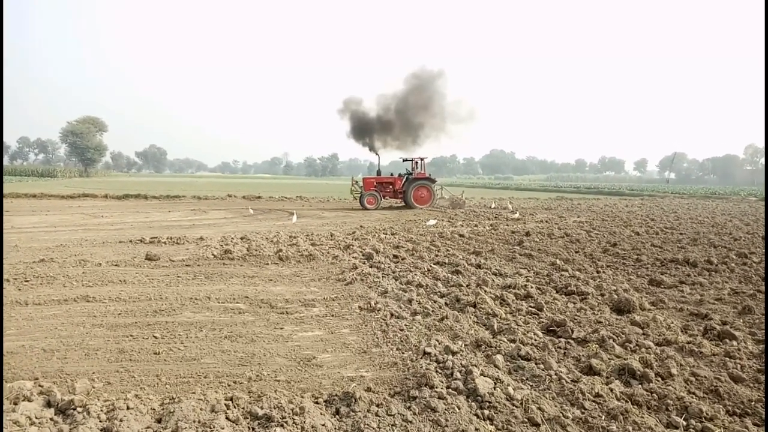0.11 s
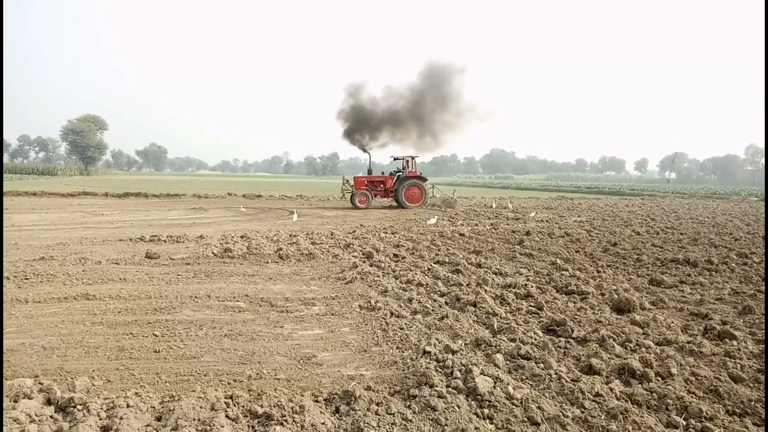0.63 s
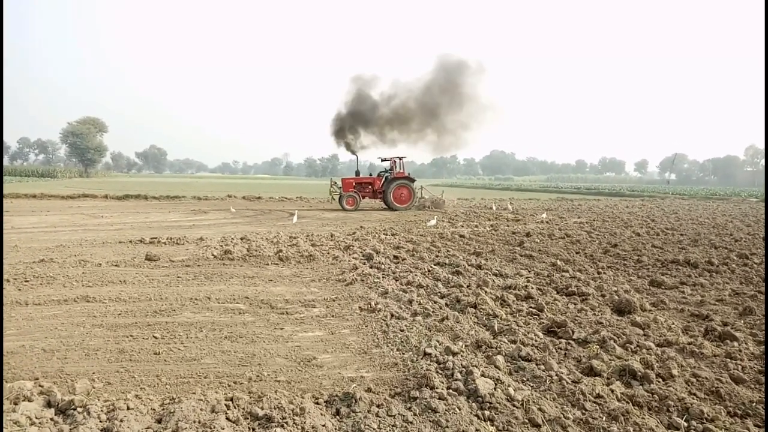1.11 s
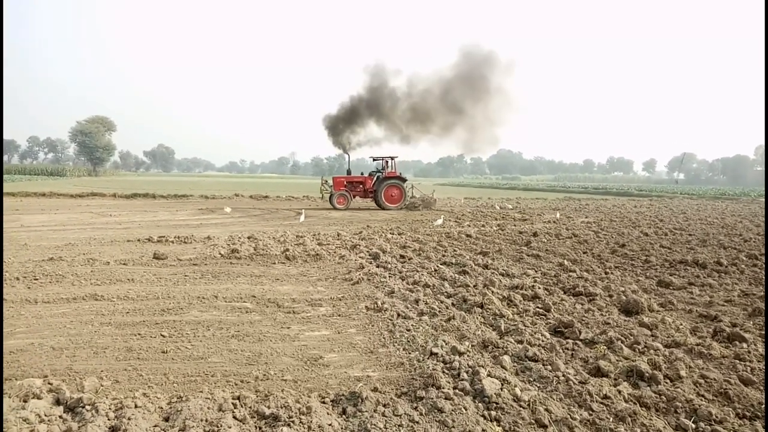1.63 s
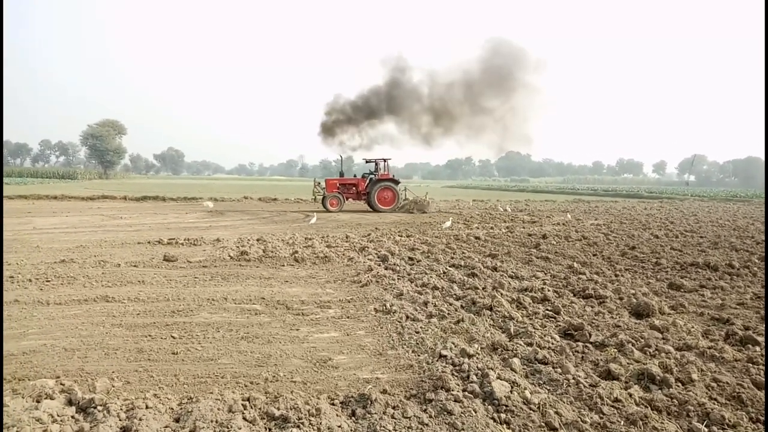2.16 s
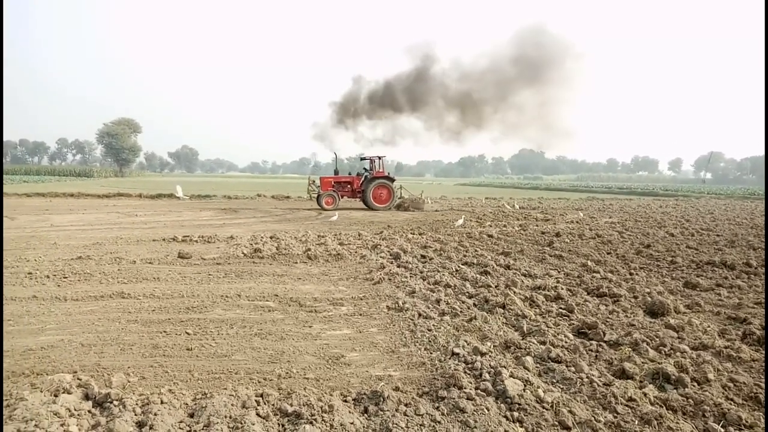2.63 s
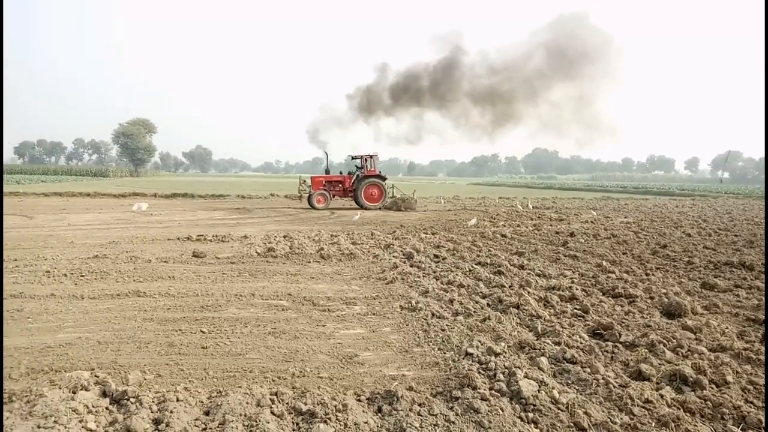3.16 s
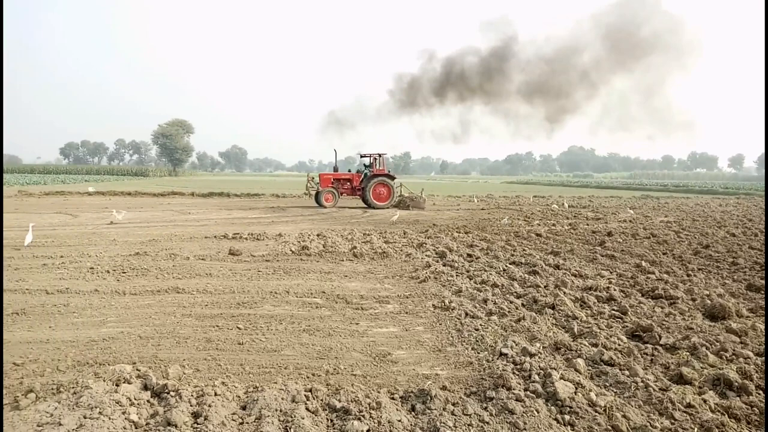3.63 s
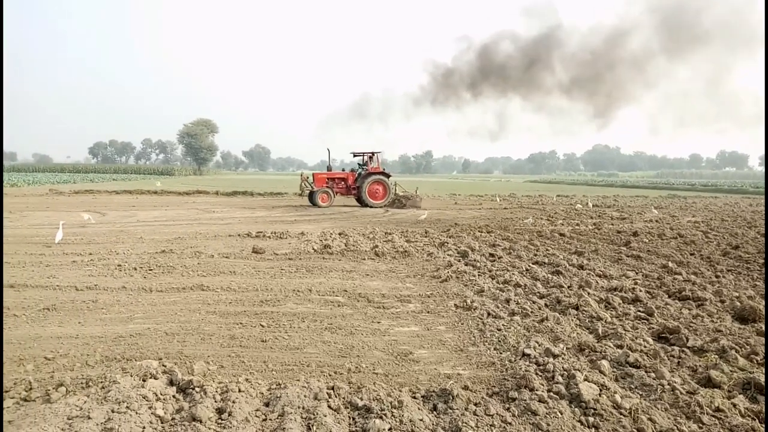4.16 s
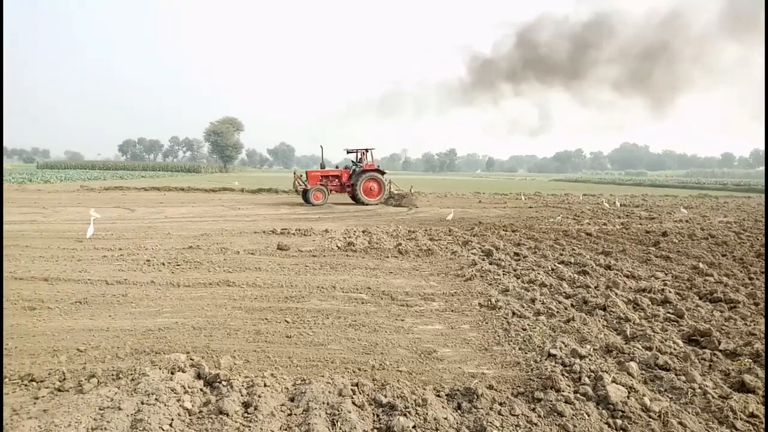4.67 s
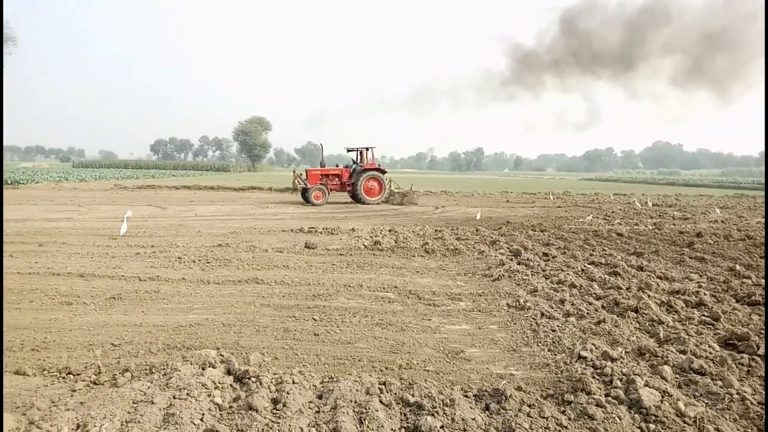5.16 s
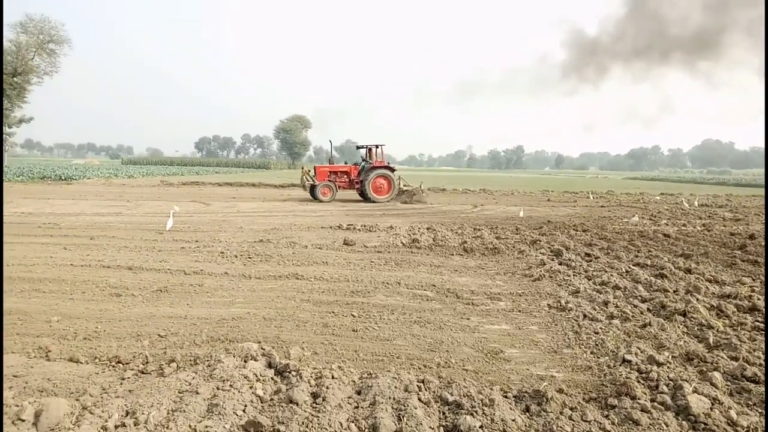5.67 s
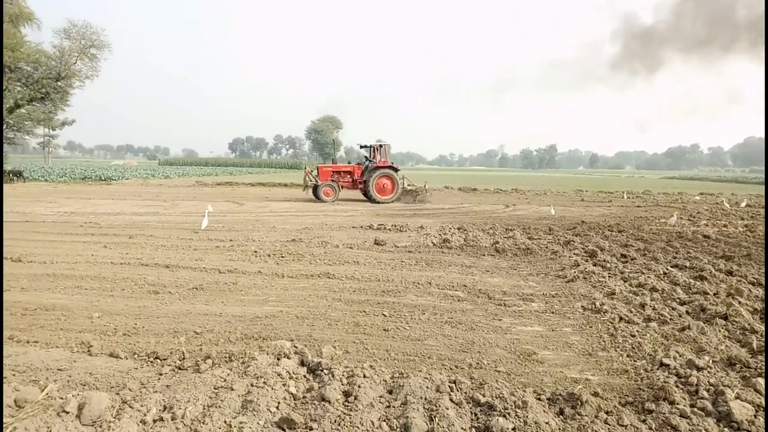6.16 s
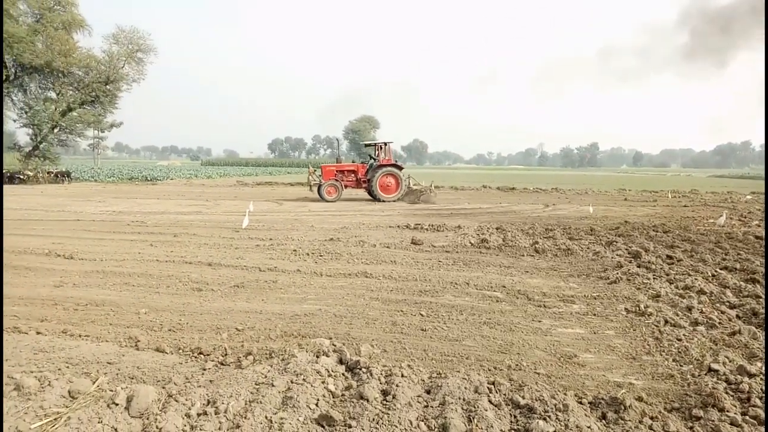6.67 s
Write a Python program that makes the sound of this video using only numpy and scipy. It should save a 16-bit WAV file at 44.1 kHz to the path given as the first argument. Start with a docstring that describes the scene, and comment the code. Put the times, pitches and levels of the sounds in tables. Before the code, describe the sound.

An old four-cylinder diesel tractor works across an open field, heard from some distance. It starts lugging, each firing a hard, uneven knock over a low exhaust drone. After about a second it climbs in pitch, briefly overshoots near two seconds, then holds a roughly steady rattling drone. A handheld stereo recorder picks it up, louder on the left, with no noticeable echo.

```python
"""Across an open field, some way off, a four-cylinder diesel tractor pulls a tiller.
It starts lugging, gains speed, then roughly holds it. The crank drives every layer: sines for the exhaust
drone, gear whine, driveline hum and weaker tones; coloured noise for roar, boom, clatter, rattle, knock and
hiss, pulsed by firings and taps; struck resonances for the block. Two unlike microphone ports of a
handheld recorder pick it up."""
import sys
import numpy as np
from scipy import signal
from scipy.fft import rfft, irfft
from scipy.io import wavfile
from scipy.ndimage import uniform_filter1d, minimum_filter1d, map_coordinates

SR = 44100
rng = np.random.default_rng(int(sys.argv[2]) if len(sys.argv) > 2 else 0)


def int16_out(signal):
    """Quantize to a 16-bit WAV file."""
    q = np.round(np.clip(np.atleast_2d(signal).T, -1, 1) * 32767)
    wavfile.write(sys.argv[1], SR, q.astype(np.int16))


def amplitude_ratio(level_db):
    """Convert a level in decibels to the matching linear amplitude (field) ratio."""
    exponent = np.asarray(level_db, float) / 20
    return 10 ** exponent


N = 299880   # samples, 6.8 s
WORKING_SPEED = 60   # firings per s


def rms_one(x):
    """Scale to rms 1."""
    return x / np.sqrt(np.mean(x ** 2) + 1e-20)


def in_time(rows):
    """Read a two-column curve at every sample."""
    s, value = np.transpose(rows)
    return np.interp(np.arange(N) / SR, s, value)


def on_bins(points):
    """Read a table over frequency at every FFT bin, along a log axis."""
    hz, value = np.transpose(points)
    return np.interp(np.log(np.arange(N // 2 + 1) * SR / N + 1), np.log(hz), value)


def drift(rate):
    """Slow chance of spread 1, mostly below rate in Hz: twice-smoothed noise, drawn every 40 samples."""
    r = np.exp(-2 * np.pi * rate * 40 / SR)
    noise = rng.standard_normal(N // 40 + 2002)
    slow = signal.lfilter([1], [1, -2 * r, r * r], noise)[2000:]
    return np.interp(np.arange(N) / 40, np.arange(len(slow)), rms_one(slow))


def level(rule, speed):
    """A part's level in dB from engine speed, time gone by and a slow wavering."""
    base_db, per_speed_db, per_s_db, waver_db = rule
    moving_on_db = per_s_db * np.arange(N) / SR
    return base_db + per_speed_db * (speed - WORKING_SPEED) + moving_on_db + waver_db * drift(5.3)


# Engine speed. Each row: time in seconds, firings per second.
ENGINE_SPEED = [(0.0, 51.48), (0.44, 51.73), (0.67, 51.04), (1.07, 50.28), (1.37, 53.58), (1.61, 56.62),
                (2.02, 60.87), (2.22, 64.49), (2.48, 60.23), (2.79, 62.68), (3.04, 60.41), (3.67, 61.26),
                (3.73, 58.72), (4.37, 58.99), (4.5, 59.72), (4.71, 58.08), (4.87, 59.31), (5.84, 61.18),
                (5.88, 59.36), (6.12, 60.73), (6.56, 60.02), (6.8, 61.68)]


def crank():
    """Engine speed, and the running count of firings it adds up to."""
    speed = in_time(ENGINE_SPEED)
    return speed, 0.4875 + np.cumsum(speed) / SR


# The firing swell is deepest while the engine lugs. Each row: time in seconds, depth in dB.
SWELL_DEPTH = [(0, 3.5), (1.25, 3.5), (1.6, 3), (2.0, 2), (2.6, 1.5), (6.8, 2)]


def load():
    """Firing depth in dB, and lugging from 0 (running free) to 1 (labouring)."""
    depth_db = in_time(SWELL_DEPTH)
    return depth_db, np.clip((depth_db - 2) / 1.5, 0, 1)


# Strength each cylinder adds to its swell: one value per cylinder in firing order, in dB.
CYLINDER_STRENGTH = [1.2, -1.5, 1.6, 0.52]


def throb(firings, depth_db, early, spread_db=.6):
    """A swell on every firing, quicker up than down, of a strength that varies by cylinder and by chance."""
    place = firings + early + .5
    count = place.astype(int)
    chance_db = spread_db * rng.standard_normal(N // 500)[count]
    strength_db = np.array(CYLINDER_STRENGTH)[count % 4] + chance_db
    # the swell is zero between firings, so strengths change unheard
    swell = .5 - .5 * np.cos(2 * np.pi * (place % 1) ** 0.74)
    return amplitude_ratio(swell * (2 * depth_db + strength_db) - depth_db)


# Valve and linkage taps in a four-firing cycle. Each row: place in firings, dB over the bed in the bonnet,
# in the casing, in the treble, dB more in the casing while lugging.
VALVE_TAPS = [(0.721, -3, -9, -3, 16), (1.6, 2, -3, -4, 0), (2.44, 4, -12, -8, 0), (2.76, -2, -12, -9, 4),
              (3.4, 2, 9, 4, -6)]


def taps(firings, lugging, length=0.11, spread_db=3):
    """Bursts dying over a length in firings, on a steady bed: envelopes for bonnet, casing and treble."""
    out = np.ones((3, N))
    casing_only = np.array([[0], [1], [0]])
    for place, *levels_db, lugging_db in VALVE_TAPS:
        since = firings - place + 4
        cycle = (since // 4).astype(int)
        chance_db = spread_db * rng.uniform(-1.7, 1.7, N // 2000)[cycle]
        tap_db = np.array(levels_db)[:, None] + chance_db + lugging_db * lugging * casing_only
        out += amplitude_ratio(tap_db) * np.exp(-(since % 4) / length)
    return out


# Share that arrives scattered, unlike at the two ports. Each row: frequency in Hz, share from 0 to 1.
SCATTERED_SHARE = [(300, .03), (900, .1), (1600, .3), (2100, .2), (3500, .4), (6000, .55), (10000, .6)]


def open_air(envelope, colour):
    """Coloured noise of rms 1: a direct part common to both ports plus a scattered part of their own."""
    direct, *scattered = rfft(rng.standard_normal((3, N)) * envelope)
    share = on_bins(SCATTERED_SHARE)
    both = np.sqrt(1 - share ** 2) * direct + share * np.array(scattered)
    last_hz, last_db = colour[-1]
    closed = colour + [(4 * last_hz, last_db - 60)]   # keeps falling above the last point
    return rms_one(irfft(both * amplitude_ratio(on_bins(closed)), N))


def tone(level_db, phase):
    """A sine whose rms follows a level in dB."""
    return np.sqrt(2) * amplitude_ratio(level_db) * np.cos(phase)


# Exhaust at once and at three times the firing rate. Each rule: dB at working speed and 0 s,
# dB per extra firing per second, dB per second as the tractor moves on, slow wavering in dB.
FIRST_ORDER_RULE = (-31, 0.4, -0.14, 1)
THIRD_ORDER_RULE = (-42, 0.6, 0.5, 1.6)
# Exhaust at twice the firing rate. Each row: time in seconds, level in dB.
SECOND_ORDER_LEVEL = [(0, -28.5), (1.5, -29.5), (1.8, -27.5), (2.5, -26.5), (3.3, -26), (3.85, -27),
                      (4.25, -27), (4.6, -30.5), (5.2, -26.5), (5.5, -25), (6.8, -26)]


def exhaust_drone(turn, speed):
    """Clean low orders of the exhaust, locked to the firings with a little wander in level and phase."""
    first_db = level(FIRST_ORDER_RULE, speed) + 0.6 * drift(12)
    second_db = in_time(SECOND_ORDER_LEVEL) + 0.87 * drift(5.0)
    third_db = level(THIRD_ORDER_RULE, speed) + 1.5 * drift(6)
    out = tone(first_db, turn + .08 * drift(6))
    out += tone(second_db, 2 * turn - .4 + 0.079 * drift(0.64))
    return out + tone(third_db, 3 * turn + 2.3 + .4 * drift(2.5))


# Timing gear whine. Each row: time in seconds, level in dB.
GEAR_WHINE_LEVEL = [(0, -39.5), (1.0, -45.5), (1.3, -40.5), (1.6, -36.5), (1.8, -38), (2.1, -49),
                    (2.5, -34.5), (2.9, -36), (3.3, -37.5), (3.7, -35.5), (4.4, -37.5), (5.2, -49),
                    (5.7, -40), (6.2, -57), (6.5, -32.5), (6.8, -44)]


def gear_whine(turn):
    """Timing gears whine at 10.5 times the firing rate."""
    return tone(in_time(GEAR_WHINE_LEVEL) + 1.2 * drift(10), 10.5 * turn + .3 * drift(5))


# Swells of the driveline hum. Each row: start in seconds, length in seconds, peak of the swell alone in dB.
DRIVELINE_SWELLS = [(2.007, 0.53, -44), (3.65, 1.07, -33), (4.89, 0.59, -38.5), (5.5, 1.6, -41.5)]


def driveline_hum(turn):
    """A hum at 4.41 times the firing rate swells smoothly out of a faint bed."""
    t = np.arange(N) / SR
    loudness = amplitude_ratio(-46.5) * np.ones(N)   # bed
    for start, length, peak_db in DRIVELINE_SWELLS:
        loudness += amplitude_ratio(peak_db) * np.sin(np.pi * np.clip((t - start) / length, 0, 1))
    return tone(20 * np.log10(loudness) + 2.4 * drift(9.1), 4.41 * turn + 0.49 * drift(3.1))


# Weaker crank-locked tones, gear teeth and fan among them.
# Each row: multiple of the firing rate, level in dB at the start, level in dB at the end.
WEAKER_TONES = [(1.5, -54, -45.5), (2.22, -42, -52), (2.75, -58, -45), (3.44, -48, -37), (3.72, -62, -37),
                (4, -44.5, -39.5), (4.14, -44.5, -39), (4.75, -55.5, -41), (5, -48, -45), (5.5, -52.5, -39),
                (6, -44, -58), (6.27, -49, -45.5), (6.85, -46, -54), (8.27, -57.5, -50), (9, -55.5, -52),
                (10.25, -59, -40), (10.75, -46, -43.5), (11.25, -52, -42), (11.75, -54, -44),
                (12.75, -45, -54), (13.5, -43.5, -40.5), (14.5, -51, -41.5)]


def weaker_tones(turn):
    """Faint sines on multiples of the firing rate, wavering as the air stirs."""
    out, along = np.zeros(N), np.arange(N) / N
    for multiple, start_db, end_db in WEAKER_TONES:
        level_db = start_db + (end_db - start_db) * along + 2.1 * drift(2.4)
        out += tone(level_db, multiple * turn + 0.78 * drift(2.84) + rng.uniform(0, 2 * np.pi))
    return out


# Colour of the roar. Each row: frequency in Hz, relative dB per Hz.
ROAR_COLOUR = [(25, 0), (45, -19), (85, 3.5), (150, 1.5), (200, -2.5), (255, -1.5), (350, -0.5),
               (460, -16.5), (700, -50)]
# Rule: dB at working speed and 0 s, dB per extra firing per second, dB per second, slow wavering in dB.
ROAR_RULE = (-33.5, 0.25, 0.27, 0.2)


def exhaust_roar(firings, speed):
    """Low noise that puffs twice a firing."""
    puffs = amplitude_ratio(1.3 * np.cos(4 * np.pi * firings + 0.55) + 0.32 * drift(9.9))
    return amplitude_ratio(level(ROAR_RULE, speed)) * open_air(puffs, ROAR_COLOUR)


# Colour of the boom. Each row: frequency in Hz, relative dB per Hz.
BOOM_COLOUR = [(350, -29), (470, -22.5), (560, -12), (630, -4.5), (900, -4), (1050, -4.5), (1250, -24.5)]
# Rule: dB at working speed and 0 s, dB per extra firing per second, dB per second, slow wavering in dB.
BOOM_RULE = (-27, 0.08, -0.32, -0.35)


def bonnet_boom(speed, bonnet_taps, late_swells, clumps):
    """Low-mid bonnet noise, tapped, gently pulsed by firings, roughened by quick chance swells in level."""
    return amplitude_ratio(level(BOOM_RULE, speed)) * open_air(bonnet_taps * late_swells ** 0.27 * clumps, BOOM_COLOUR)


# Colour of the clatter. Each row: frequency in Hz, relative dB per Hz.
CLATTER_COLOUR = [(850, -24.5), (1050, -4.5), (1300, -2), (1700, -5.5), (2300, -12), (3500, -83)]
# Rule: dB at working speed and 0 s, dB per extra firing per second, dB per second, slow wavering in dB.
CLATTER_RULE = (-27, 0.03, 0.02, 0.13)


def casing_clatter(speed, casing_taps, swells, clumps):
    """Midrange noise from the casing, led by the taps and roughened by quick chance swells in level."""
    envelope = casing_taps * swells ** 0.23 * clumps ** .6 * amplitude_ratio(.4 * drift(30))
    return amplitude_ratio(level(CLATTER_RULE, speed)) * open_air(envelope, CLATTER_COLOUR)


# Colour of the rattle. Each row: frequency in Hz, relative dB per Hz.
RATTLE_COLOUR = [(1200, -24.5), (1700, -6), (2150, 1.8), (2500, -6.5), (2850, -1), (3100, -23), (3600, -49)]
# Rule: dB at working speed and 0 s, dB per extra firing per second, dB per second, slow wavering in dB.
RATTLE_RULE = (-29.5, 0.1, -0.28, 0.7)


def upper_rattle(speed, treble_taps, late_swells):
    """Upper-mid noise that follows firings and taps alike."""
    return amplitude_ratio(level(RATTLE_RULE, speed)) * open_air(late_swells ** 1.24 * treble_taps, RATTLE_COLOUR)


# Colour of the combustion knock. Each row: frequency in Hz, relative dB per Hz.
KNOCK_COLOUR = [(2700, -14), (3150, -5.5), (3600, -1.5), (4000, -5.5), (4350, -7.5), (4700, -12.5),
                (5300, -18.5), (6000, -35.5), (8000, -76)]
# Level of the combustion knock. Each row: time in seconds, level in dB.
KNOCK_CURVE = [(0, -29), (1.2, -28.5), (1.8, -28.5), (3.0, -29), (3.9, -30), (5.0, -30), (6.0, -30.5),
               (6.8, -29)]


def combustion_knock(treble_taps, swells):
    """Presence-range noise that swells with each burn, over softened taps."""
    knock_db = in_time(KNOCK_CURVE) + .4 * drift(4)
    return amplitude_ratio(knock_db) * open_air(swells * treble_taps ** 0.44, KNOCK_COLOUR)


# Colour of the injector hiss. Each row: frequency in Hz, relative dB per Hz.
HISS_COLOUR = [(3500, -18), (5200, 14), (6000, 15.5), (6500, 4), (7000, -8), (8000, -30)]
# Level of the injector hiss. Each row: time in seconds, level in dB.
HISS_CURVE = [(0, -46.5), (1.2, -51.5), (2.0, -51.5), (3.0, -53.5), (4.4, -53), (5.2, -53), (5.6, -53),
              (6.8, -49)]


def injector_hiss(treble_taps, late_swells, lugging):
    """Treble noise, pulsed harder by the firings while lugging."""
    envelope = late_swells ** (.5 + 0.89 * lugging) * treble_taps
    return amplitude_ratio(in_time(HISS_CURVE)) * open_air(envelope, HISS_COLOUR)


# Colour of the hiss's top. Each row: frequency in Hz, relative dB per Hz.
SIZZLE_COLOUR = [(5500, -25), (6300, -3.5), (7000, 2), (7500, -4), (8200, -5), (8800, -19), (10500, -48)]
# Level of the hiss's top. Each row: time in seconds, level in dB.
SIZZLE_CURVE = [(0, -54), (.2, -49), (.5, -53.5), (1.2, -53.5), (2.0, -55.5), (2.6, -57), (3.4, -57.5),
                (4.2, -57), (5.2, -56.5), (5.8, -55.5), (6.8, -53.5)]


def sizzle(treble_taps, late_swells):
    """The top of the hiss, strongly pulsed by the firings."""
    return amplitude_ratio(in_time(SIZZLE_CURVE)) * open_air(late_swells ** 1.5 * treble_taps, SIZZLE_COLOUR)


# Faint top of the engine noise at each port. Each row: frequency in Hz, left and right in relative dB per Hz.
TOP_COLOURS = [(7040, -31, -31), (8300, -14, -23), (9900, 5, -3), (11400, -4, -7.5), (12300, 1, -12),
               (13500, 0, -25), (14600, 0.5, -15), (14800, -16, -21), (15300, -27, -33)]


def faint_top(swells, depth_db):
    """Thin treble noise, unlike at the two ports, pulsed by the firings and wavering by chance."""
    envelope = swells ** 0.69 * amplitude_ratio(1.2 * drift(18) + 0.7 * depth_db)   # stronger while firings are deep
    hz, *sides = np.transpose(TOP_COLOURS)
    colours = amplitude_ratio(np.array([on_bins(np.c_[hz, side]) for side in sides]))
    noise = rfft(rng.standard_normal((2, N)) * envelope)
    return amplitude_ratio(-65.5) * rms_one(irfft(noise * colours, N))


# Modes of the engine block. Each row: frequency in Hz, relative strike in dB, t60 in seconds.
BLOCK_MODES = [(651, -26.5, 0.058), (800, -23, 0.015), (1290, -26, 0.05), (2130, -23, 0.014),
               (3395, -16, 0.011), (3590, -17.5, 0.022), (3730, -21.5, 0.017), (4235, -26, 0.015),
               (4356, -28, 0.022), (5200, -40, 0.01)]


def block_ring(burns, depth_db):
    """Each firing strikes every mode, a little early or late, by a chance strength; harder while lugging."""
    at = np.flatnonzero(np.diff(np.floor(burns + .24)))
    out = np.zeros(N)
    for hz, level_db, t60 in BLOCK_MODES:
        late, chance = rng.standard_normal((len(at), 2)).T
        when = np.clip(at + (0.0005 * SR * late).astype(int), 0, N - 1)   # spread 0.5 ms
        clicks = np.full(N, 1e-18)
        clicks[when] = amplitude_ratio(level_db + 4.6 * (depth_db[at] - 4) + 1.3 * chance)
        r, w = amplitude_ratio(-60 / (t60 * SR)), 2 * np.pi * hz / SR
        ring = signal.lfilter([0, np.sin(w)], [1, -2 * r * np.cos(w), r * r], clicks)
        soft_onset = signal.butter(1, [0.903 * hz, 1.022 * hz], "band", fs=SR, output="sos")
        out += signal.sosfilt(soft_onset, ring)
    return out


def scene():
    """Tones and noisy parts, all driven by the crank."""
    speed, firings = crank()
    depth_db, lugging = load()
    turn = 2 * np.pi * firings
    burns = firings - .14 * lugging   # the burn comes later while lugging
    swells = throb(burns, depth_db, early=.07)
    late_swells = throb(burns, depth_db, early=-.07)
    bonnet_taps, casing_taps, treble_taps = taps(firings, lugging)
    clumps = amplitude_ratio(.9 * drift(35))   # quick chance swells that clump the boom and clatter

    tones = exhaust_drone(turn, speed) + gear_whine(turn) + driveline_hum(turn) + weaker_tones(turn)
    noisy = exhaust_roar(firings, speed)
    noisy += bonnet_boom(speed, bonnet_taps, late_swells, clumps)
    noisy += casing_clatter(speed, casing_taps, swells, clumps)
    noisy += upper_rattle(speed, treble_taps, late_swells)
    noisy += combustion_knock(treble_taps, swells)
    noisy += injector_hiss(treble_taps, late_swells, lugging)
    noisy += sizzle(treble_taps, late_swells)
    noisy += faint_top(swells, depth_db)
    return tones + noisy + block_ring(burns, depth_db)


def port(x, shape):
    """Peaking filters in a chain; their centres slide in blocks as the tractor's bearing changes."""
    start_hz, end_hz, width_hz, gain_db = np.transpose(shape)
    g, out, state = amplitude_ratio(gain_db / 2), np.empty(N), np.zeros((len(shape), 2))
    for i in range(0, N, 1024):
        hz = start_hz + (end_hz - start_hz) * i / N
        w = 2 * np.pi * hz / SR
        a = np.sin(w) * width_hz / hz / 2
        middle = -2 * np.cos(w)
        sos = np.c_[1 + a * g, middle, 1 - a * g, 1 + a / g, middle, 1 - a / g] / (1 + a / g)[:, None]
        out[i:i + 1024], state = signal.sosfilt(sos, x[i:i + 1024], zi=state)
    return out


# Peaks and dips of each port. Each row: centre in Hz at the start, centre in Hz at the end, width in Hz,
# gain in dB.
LEFT_PEAKS = [(1045, 1043, 59, -7), (1640, 1890, 330, -4), (2750, 2600, 280, -5.5), (3600, 3460, 295, 3.5),
              (4200, 3950, 150, -2), (4330, 4340, 280, 5.5), (7630, 6800, 1100, 1.5),
              (3260, 2907, 100, -18.5), (4800, 4500, 250, -2.5)]
RIGHT_PEAKS = [(1025, 1025, 127, -9), (1630, 1600, 165, -15), (2170, 2040, 300, 6.5),
               (2335, 2250, 190, -15.5), (4240, 4640, 970, -3.5), (7000, 6600, 630, 2.5),
               (7440, 8700, 6900, 8), (3200, 2300, 88, -1.5), (4570, 4300, 130, -9), (4850, 5340, 220, -7)]


def two_ports(dry):
    """The left port hears 40 microseconds later, the right one is quieter; each colours the sound."""
    left = map_coordinates(dry[0], [np.arange(N) - 40e-6 * SR], order=5, mode="mirror")
    return amplitude_ratio(3.5) * np.array([port(left, LEFT_PEAKS), amplitude_ratio(-6.4) * port(dry[1], RIGHT_PEAKS)])


def limiter(x, ceiling):
    """Gain dips smoothly for a few milliseconds around any peak over the ceiling."""
    need = np.minimum(1, ceiling / (abs(x).max(axis=0) + 1e-9))
    held = minimum_filter1d(need, size=401)
    return x * uniform_filter1d(uniform_filter1d(held, size=201), size=201)


def roll_off(x):
    """The treble ends steeply here."""
    return signal.sosfilt(signal.butter(12, 15300, fs=SR, output="sos"), x)


def record(dry):
    """The handheld recorder: two ports, then peaks held under a ceiling of 0.56 of full scale."""
    mix = limiter(two_ports(dry), ceiling=.56)
    return roll_off(mix)


dry = scene()
out = record(dry)
int16_out(out)
```